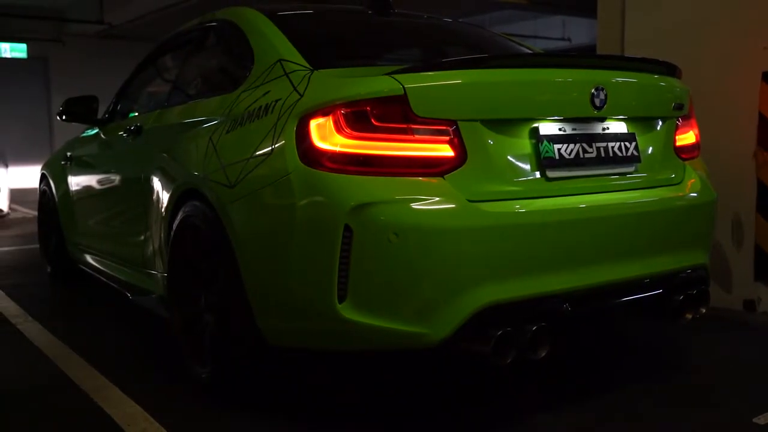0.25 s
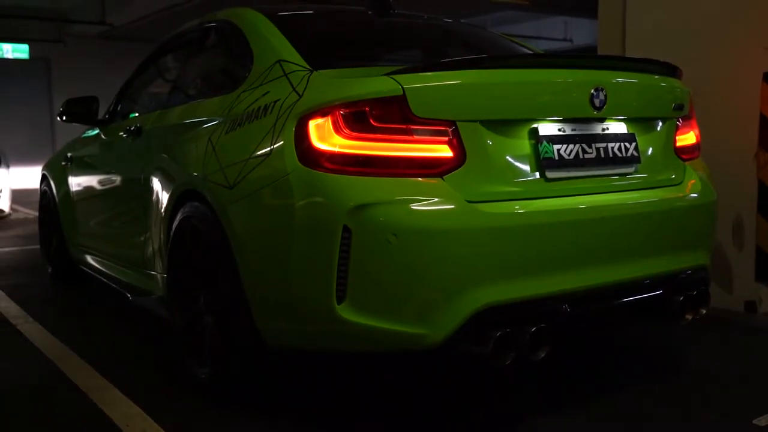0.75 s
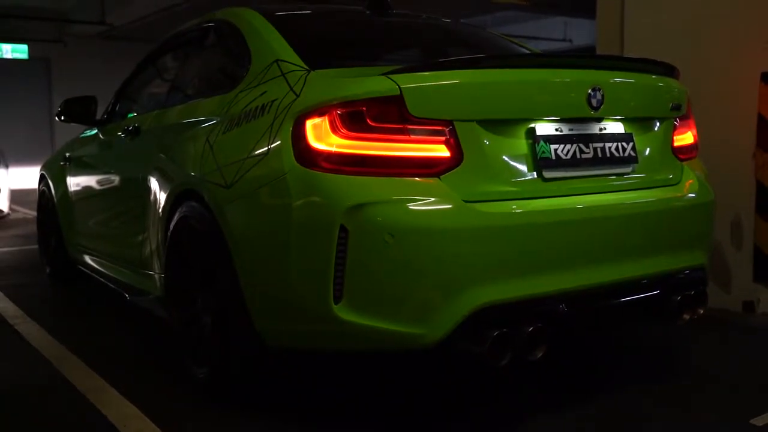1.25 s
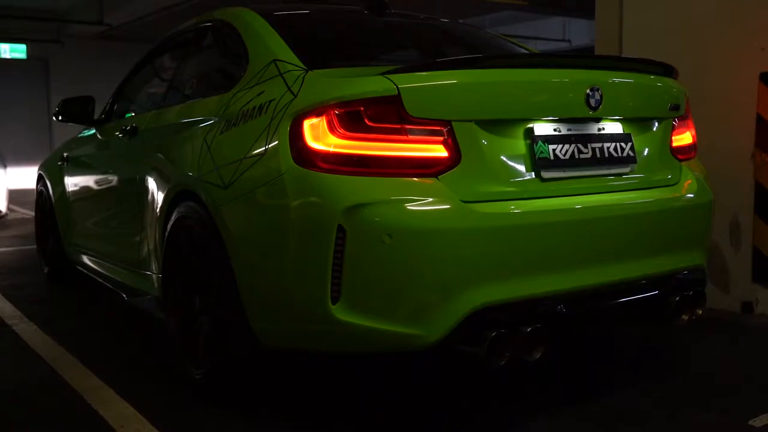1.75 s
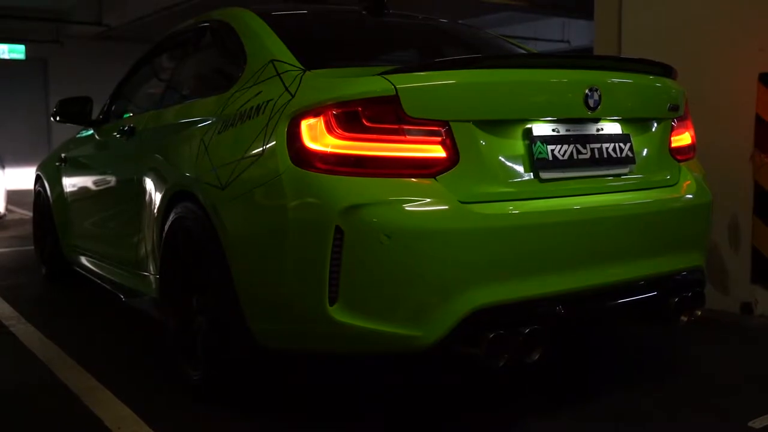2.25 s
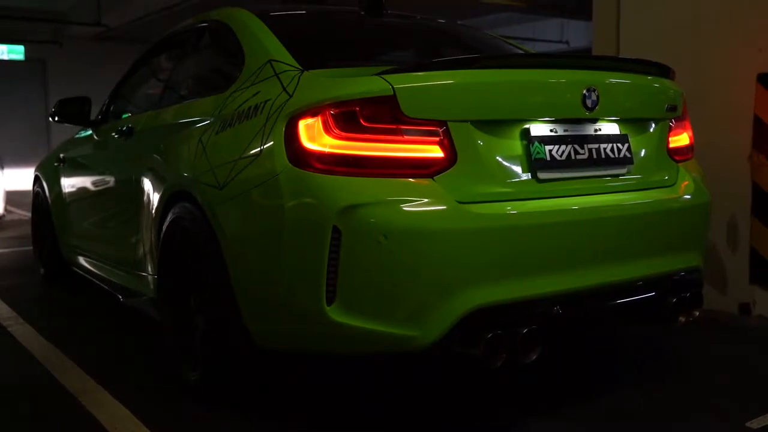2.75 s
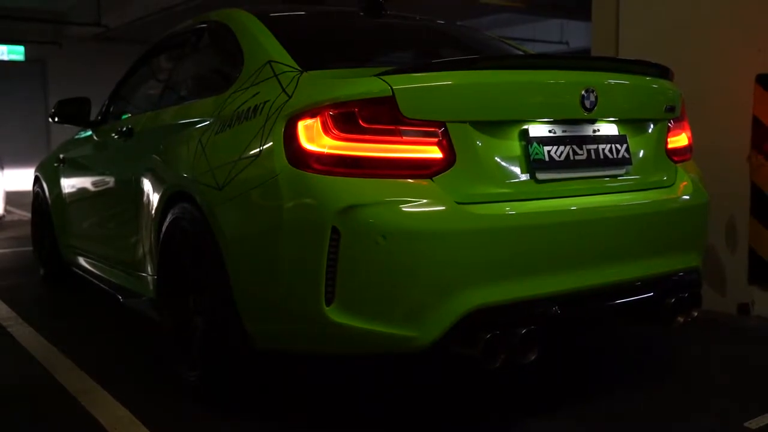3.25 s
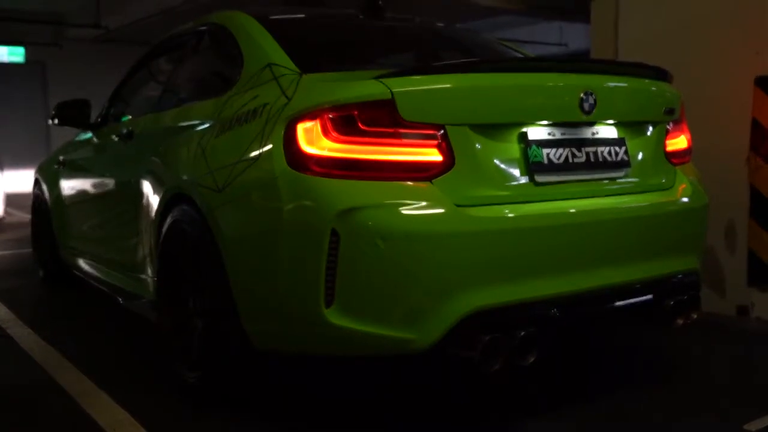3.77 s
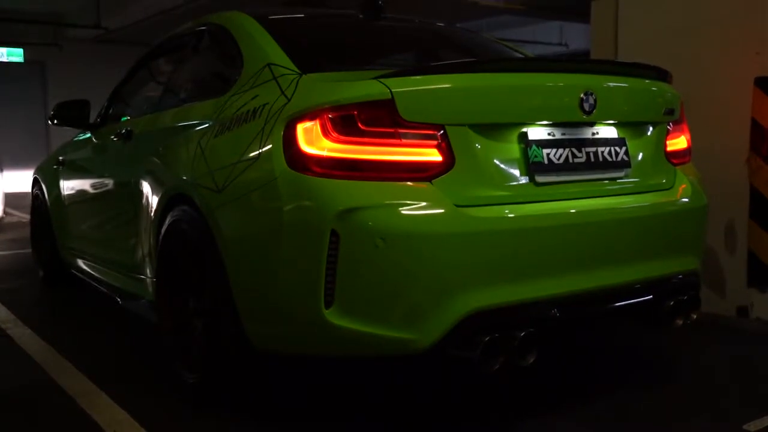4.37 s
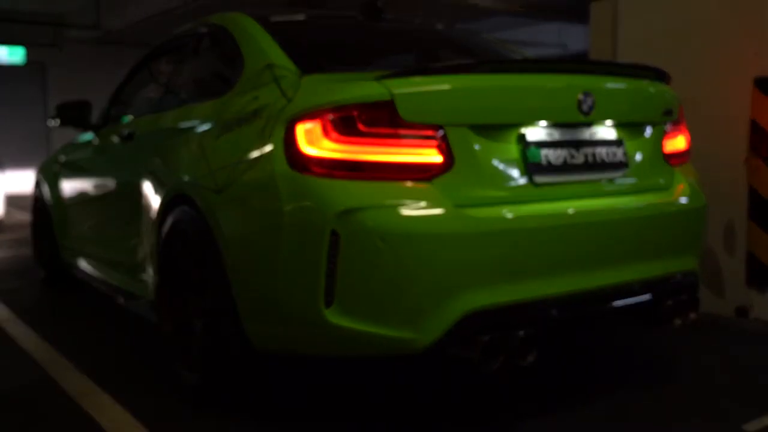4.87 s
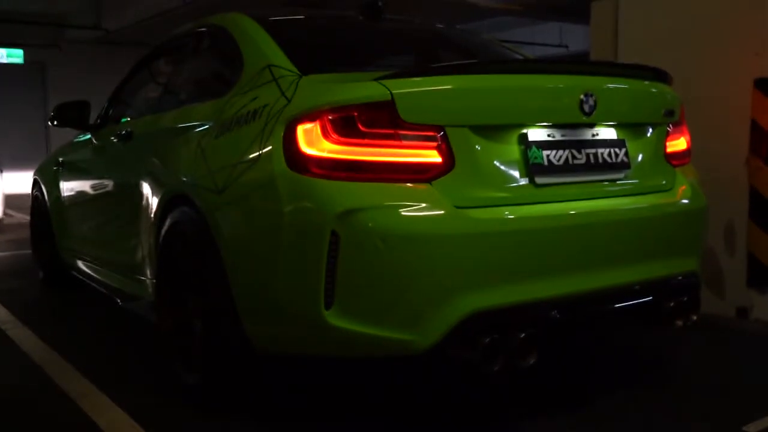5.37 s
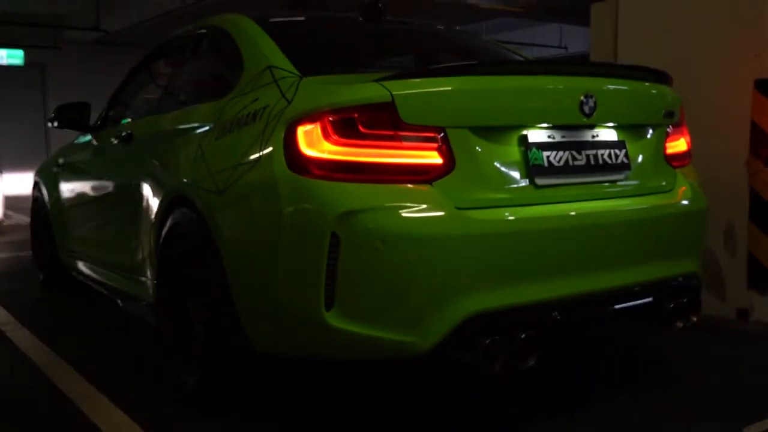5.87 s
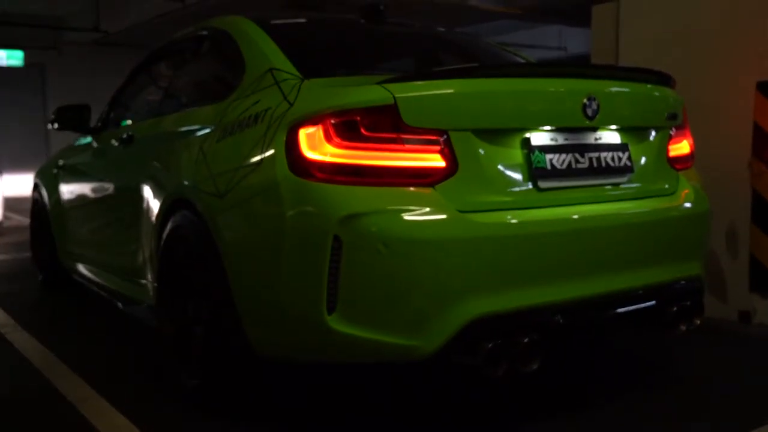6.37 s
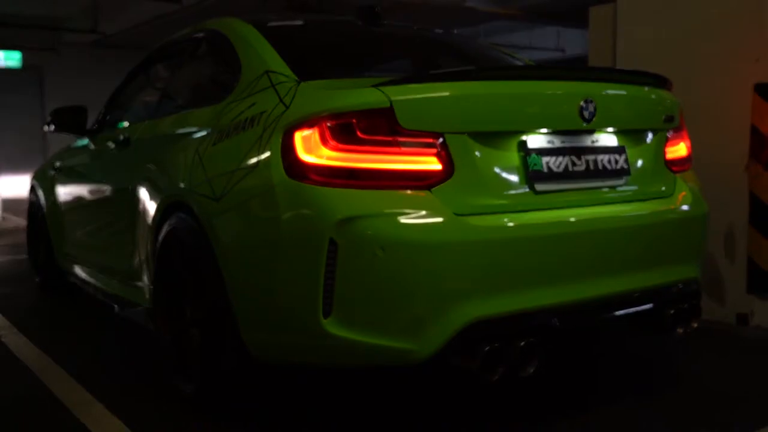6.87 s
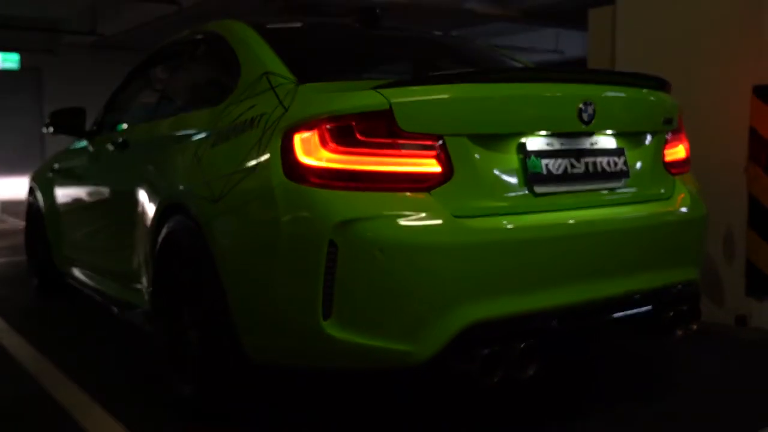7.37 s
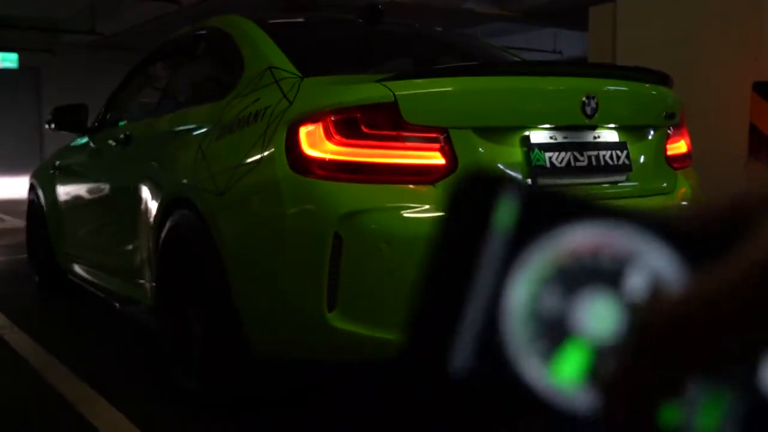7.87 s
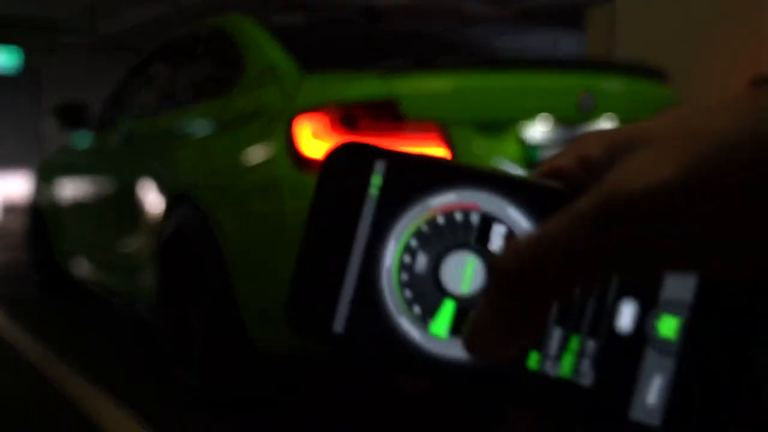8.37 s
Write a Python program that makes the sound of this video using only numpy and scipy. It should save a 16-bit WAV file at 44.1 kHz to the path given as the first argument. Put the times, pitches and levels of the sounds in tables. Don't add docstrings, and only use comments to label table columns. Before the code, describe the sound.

Two loud throttle stabs from a sporty car in an underground garage: each jumps up quickly into a raspy roar, bursts into gassy crackle when the pedal lifts, then slides down with a breathy descending whistle. After the second, scattered pops and spits fade to a gentle throbbing idle over steady ventilation hum. Close, overloaded microphone, hard concrete reverberation.

```python
import sys
import numpy as np
from scipy import signal
from scipy.fft import rfft, irfft, next_fast_len
from scipy.io import wavfile
from scipy.ndimage import uniform_filter1d

SR = 44100
rng = np.random.default_rng(int(sys.argv[2]) if len(sys.argv) > 2 else 0)


def to_wav(sig):
    pcm = np.clip(np.atleast_2d(sig), -1, 1) * 32767
    pcm = np.round(pcm).astype(np.int16)
    wavfile.write(sys.argv[1], SR, pcm.T)


def level_to_linear(level):
    exponent = np.asarray(level, float) / 20
    return 10 ** exponent


N = 380583
SWITCH_S = 0.062


def unit(x):
    return x / np.sqrt(np.mean(x ** 2))


def noise():
    return rng.standard_normal(N)


def low(x, hz, order):
    return signal.sosfilt(signal.butter(order, hz, fs=SR, output="sos"), x)


def high(x, hz, order):
    return signal.sosfilt(signal.butter(order, hz, "high", fs=SR, output="sos"), x)


def curve(table):
    s, *columns = np.transpose(table)
    return [np.interp(np.arange(N) / SR, s, c) for c in columns]


def ring(x, modes):
    return sum(level_to_linear(db) * signal.lfilter(*signal.iirpeak(hz, hz / width, SR), x) for hz, width, db in modes)


def colour(x, shape):
    hz, db = np.transpose(shape)
    size = next_fast_len(N)
    log_hz = np.log(np.arange(1, size // 2 + 2) * SR / size)
    gain = level_to_linear(np.interp(log_hz, np.log(hz), db))
    return irfft(rfft(x, size) * gain, size)[:N]


def walk(rate):
    k = int(SR / rate)
    steps = np.repeat(rng.standard_normal(N // k + 1), k)
    return unit(uniform_filter1d(uniform_filter1d(steps, k), k)[:N])


def loudest(shapes):
    return np.max([np.interp(np.arange(N) / SR, s, db) for s, db in shapes], axis=0)


def during(spans):
    return loudest([([a - SWITCH_S / 2, a, b, b + SWITCH_S], [0, 1, 1, 0]) for a, b in spans])


# t/s, firing rate f/Hz
SPEED = [(0, 85.3), (.5, 296.4), (.58, 312), (.7, 327.2), (1.1, 276.6), (1.7, 201), (2.425, 132.5),
         (2.81, 295), (3.0, 321), (3.75, 228.2), (4.45, 156.5), (5.26, 89), (5.75, 57.3), (6.05, 48),
         (6.8, 46.77), (7.3, 43.2), (8.1, 40), (8.63, 41.2)]


def engine():
    hz, = curve(SPEED)
    turns = np.cumsum(hz) / SR
    count, angle = turns.astype(int), turns % 1
    strength, gust_db = rng.standard_normal((N // 100, 2))[count].T
    gas_db, hiss_db = gas_flow(), boost()
    puff = .65 + np.minimum(angle / .06, 1) * np.exp(-angle / .4)
    puff = puff * level_to_linear(1.6 * gust_db)
    exhaust = exhaust_pipe(count, angle, strength, puff, gas_db)
    return exhaust + tip_gas(puff, gas_db, hiss_db) + air_hiss(puff, hiss_db) + casing(puff, gas_db) + turbine(turns)


CYLINDERS = [1.7, -1.0, -.3, .8, -.1, -1.1]
# f/Hz, width/Hz, level/dB
PIPE = [(80, 14, 3), (103, 12, -11), (140, 16, -7), (161, 18, 0), (226, 24, -1), (285, 26, 1),
        (375, 34, -1), (430, 28, -3), (485, 36, -3), (590, 60, -8), (770, 80, -8)]


def exhaust_pipe(count, angle, strength, puff, gas_db):
    even_db, lumpy_db, ragged_db = burn(gas_db)
    uneven = level_to_linear(lumpy_db) * (np.take(CYLINDERS, count % len(CYLINDERS)) + 0.53 * strength)
    blow = 85 * angle * np.exp(-angle / .11)
    steady = blow + low(uneven * blow, 150, order=1)
    scatter = ring(ring(puff * noise(), [(391, 410, 0.003)]), [(400, 500, 0.003)])
    ragged = 9 * level_to_linear(ragged_db) * scatter
    pipe = ring(level_to_linear(even_db) * (low(steady, 1100, order=2) + ragged), PIPE)
    return high(pipe, 62, order=5)


# f/Hz, width/Hz, level/dB
TIPS = [(744, 128, 17.5), (1287, 420, 18.5), (2304, 545, 6.5), (3120, 180, -7.5), (3605, 860, 3)]


def tip_gas(puff, gas_db, hiss_db):
    gas = unit(ring(ring(puff * noise(), TIPS[:2]), [(1015, 370, 0)]))
    jet = ring(ring(puff * noise(), TIPS[2:]), [(2854, 1170, 0)])
    jet_db = 0.66 * gas_db + .35 * hiss_db - .8
    return level_to_linear(gas_db) * gas + level_to_linear(jet_db) * unit(low(jet, 5350, order=3))


# f/Hz, level/dB per Hz
HISS = [(3000, -9.5), (4200, -3.5), (5500, -3), (8000, -9.5), (11000, -18), (16000, -43)]


def air_hiss(puff, hiss_db):
    return level_to_linear(hiss_db) * unit(colour(noise() * puff ** 0.6, HISS))


# f/Hz, width/Hz, level/dB
CASING = [(2210, 350, 11), (2615, 94, 11), (3040, 340, 2.5), (3720, 200, -45)]


def casing(puff, gas_db):
    return level_to_linear(0.7 * gas_db - 24.5) * unit(ring(ring(puff * noise(), CASING), CASING))


# throttle opens t/s, lifts t/s, burble after the lift t/s,
# turbine delay after the lift t/s, coasting gas level/dB
REVS = [
    (-.01, 0.589, 0.67, 1.233, -23),
    (2.401, 2.864, 0.58, 1.138, -27),
]


def gas_flow():
    rush_s, full_before_s, shut_s = 0.051, 0.047, 0.35
    first_db, rush_db, full_db, sag_db, fade_db_s = -34, -17.5, -7.5, -12, -6
    idle_s, settle_s, idle_db = 5.67, 0.34, -52
    outlines = []
    for opens, lifts, burble_s, _, coast_db in REVS:
        build_s = lifts - opens - rush_s - full_before_s
        spans = [opens - .01, .01, rush_s, build_s, full_before_s + burble_s, shut_s, 10]
        levels = [-90, first_db, rush_db, full_db, sag_db, coast_db, coast_db + 10 * fade_db_s]
        outlines.append((np.cumsum(spans), levels))
    revs = loudest(outlines)
    caught = np.clip((np.arange(N) / SR - idle_s) / settle_s, 0, 1) ** .5
    return revs + caught * (idle_db - revs) + 0.92 * (1 - caught) * walk(rate=12)


def boost():
    rush_s, bleed_s = .1, 0.35
    dump_lead_s = 0.78
    rush_db, built_db, dump_db, bleed_db, fade_db_s, rest_db = -37, -25, -18.5, -40, -17.5, -85.5
    outlines = []
    for opens, lifts, _, delay, _ in REVS:
        build_s = lifts - opens - rush_s - SWITCH_S
        spans = [opens - .03, .03, rush_s, build_s, SWITCH_S, delay - dump_lead_s, bleed_s, 10]
        levels = [-90, -50, rush_db, built_db, dump_db, dump_db, bleed_db, bleed_db + 10 * fade_db_s]
        outlines.append((np.cumsum(spans), levels))
    return np.maximum(loudest(outlines) + 1.3 * walk(rate=14), rest_db)


# t/s, level/dB
COAST = [(1.25, -14.5), (1.5, -17.5), (2.05, -21), (2.15, -18.5), (2.4, -19), (3.55, -14), (4.37, -28),
         (4.43, -19.5), (4.8, -24.5), (5.22, -26), (5.52, -20), (5.8, -33), (6.8, -34), (7.1, -30.5),
         (7.8, -30.5), (8.0, -23), (8.3, -25), (8.5, -27.5)]
# start t/s, length t/s, level/dB
STUMBLES = [
    (.61, 0.13, -15.5),
    (0.893, .37, -10.5),
    (2.112, 0.27, -16.5),
    (2.898, .66, -11),
    (4.38, 0.63, -25.5),
    (6.003, 0.63, -39.5),
    (8.201, 0.54, -39),
]


def burn(gas_db):
    t = np.arange(N) / SR
    pull = during([(opens + SWITCH_S / 2, lifts) for opens, lifts, *_ in REVS])
    burble = during([(lifts, lifts + hold - SWITCH_S) for _, lifts, hold, *_ in REVS])
    opened = t - np.where(t < REVS[1][0] - SWITCH_S, REVS[0][0], REVS[1][0])
    even, = curve(COAST)
    even = even + burble * (-23.5 - even)
    even = even + pull * (-6.5 - 15 * opened - even)
    outlines = [np.minimum(gas_db - 1.5, -28)]
    for s, length, db in STUMBLES:
        rise_db, fall_db = 110 * np.maximum(s - t, 0), 70 * np.maximum(t - s - length, 0)
        outlines.append(db - rise_db - fall_db)
    lumpy = np.max(outlines, axis=0)
    lumpy = lumpy + pull * (-45.5 - lumpy)
    coast_db, pull_db, burble_db = 1, -6.5, -2
    ragged = gas_db + coast_db + pull * (pull_db - coast_db) + burble * (burble_db - coast_db)
    return even, lumpy - even, ragged - even


# f/Hz, level/dB
TURBINE = [(1950, -95), (2100, -74), (3400, -75), (4400, -71), (5350, -59), (6500, -52.5), (7900, -51),
           (8800, -66)]
# f/Hz, width/Hz, level/dB
TURBINE_RINGS = [(2200, 100, -54), (2630, 170, -53.5), (3150, 130, -60), (4050, 200, -63)]


def turbine(turns):
    start_hz, rest_hz, slow_s = 8000, 1300, 1.9
    t, out = np.arange(N) / SR, 0
    throb = 1 + .75 * np.cos(2 * np.pi * turns)
    ends = [row[0] for row in REVS[1:]] + [N / SR + 1]
    for (_, lift, _, delay, _), end in zip(REVS, ends):
        since = np.maximum(t, lift) - lift - delay
        hz = rest_hz + (start_hz - rest_hz) * np.exp(-since / slow_s)
        flutter = 1 + hz / 130000 * walk(rate=1200)
        whistle = np.sin(2 * np.pi * np.cumsum(hz * flutter) / SR)
        on = during([(lift + delay - .12, end)])
        out = out + on * level_to_linear(2.5 * walk(60)) * throb * whistle
    return colour(out, TURBINE) + ring(out, TURBINE_RINGS)


# t/s, peak level/dB
POPS = [(.235, -4), (.6, -3), (.72, -4), (2.106, -18), (2.428, -9), (2.87, -4), (3.06, -4), (4.41, -14),
        (4.445, -17), (4.51, -19), (5.54, -12), (5.563, -18), (5.625, -22), (6.31, -30)]


def pops():
    t = np.arange(2000) / SR
    hits = np.zeros(N)
    for s, db in POPS:
        hits[int(s * SR)] = level_to_linear(db)
    crack = 4 * (np.exp(-t / .0009) - np.exp(-t / .0004)) - .35 * np.exp(-t / .004)
    rattle = .5 * np.exp(-t / 0.0043) * ring(rng.standard_normal(len(t)), [(700, 1300, 0.018)])
    pulse = low(signal.fftconvolve(hits, crack + rattle)[:N], 1600, order=3)
    return pulse + level_to_linear(4) * ring(pulse, PIPE)


# t/s, peak level/dB, brightness level/dB
SPITS = [(4.41, -13, -3), (4.446, -19, -1), (4.55, -16, -7), (4.70, -29, 4), (4.919, -29, -11),
         (5.416, -28, 2), (5.445, -26.5, -7), (5.472, -28, 1), (5.487, -27, -11), (5.53, -33, 7),
         (5.593, -23, -6), (5.612, -26, -12.5), (5.628, -21, -13), (5.698, -25, -6)]


def spits():
    t = np.arange(600) / SR
    out = np.zeros(N)
    for s, db, bright_db in SPITS:
        burst = level_to_linear(db) * np.exp(-t / 0.0024) * rng.standard_normal(len(t))
        modes = [(1290, 160, 0), (2680, 540, bright_db - 2.5), (3760, 450, bright_db - 9)]
        start = int(s * SR)
        out[start:start + len(t)] += 3 * ring(burst, modes)
    return low(out, 4300, order=4)


# bass t/s, treble t/s
HALL_T60_S = (1.56, 0.7)


def car_park(x):
    t = np.arange(SR * 2) / SR
    echoes = rng.standard_normal(len(t))
    bass = signal.lfilter(*signal.butter(1, 700, fs=SR), echoes)
    treble = .4 * (echoes - bass)
    tail = bass * level_to_linear(-60 * t / HALL_T60_S[0]) + treble * level_to_linear(-60 * t / HALL_T60_S[1])
    tail = tail * np.clip(t / 0.0033, 0, 1)
    return signal.fftconvolve(x, tail / np.linalg.norm(tail))[:N]


# f/Hz, level/dB per Hz
HALL = [(15, -61.5), (30, -15.5), (80, 0.5), (130, -2.5), (280, 6.5), (600, -22.5), (1300, -4),
        (1800, -24.5), (2600, -17.5), (4800, -61.5), (11000, -96.5)]


def hall():
    return level_to_linear(-47 + walk(rate=1.3)) * unit(colour(noise(), HALL))


def scene():
    car = engine() + pops() + spits()
    return (car + level_to_linear(-12.0) * car_park(car) + hall())[None]


def top_cut(x):
    return signal.sosfilt(signal.butter(12, 11060, fs=SR, output="sos"), x)


# t/s, length t/s, push (in full scale)
SURGES = [
    (.85, 0.08, 1.2),
    (3.09, 0.035, 0.9),
    (1.3, .035, 0.35),
]


def record(dry):
    t = np.arange(N) / SR
    push = 0
    for s, length, size in SURGES:
        inside = np.minimum(t - s, s + length - t)
        push = push + size * np.clip(inside / 0.023 + 1, 0, 1)
    drive = 1.35 * dry - push
    saturated = drive / (1 + np.abs(drive / .88) ** 4) ** .25
    coupled = high(saturated, 32, order=2)
    dull = signal.sosfilt(signal.ellip(10, .2, 75, 11050, fs=SR, output="sos"), coupled)
    return top_cut(np.clip(dull, -1, 1))


dry = scene()
out = record(dry)
to_wav(out)
```